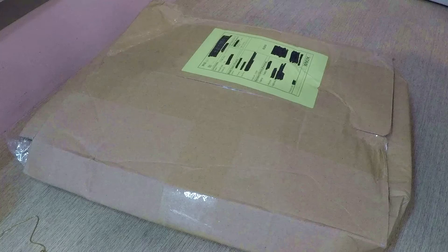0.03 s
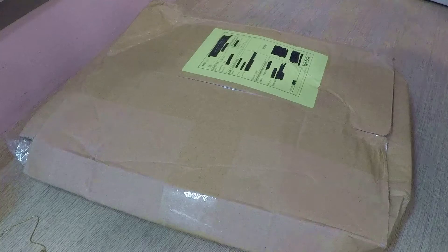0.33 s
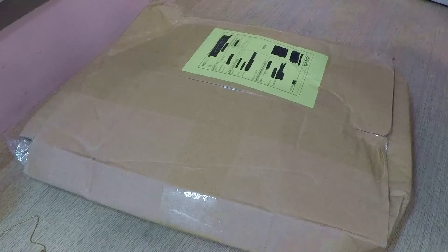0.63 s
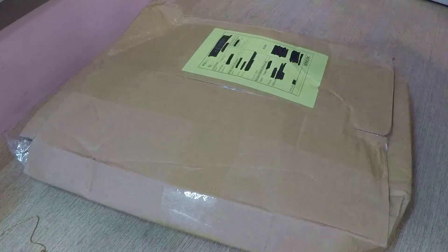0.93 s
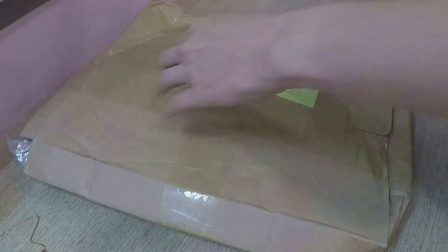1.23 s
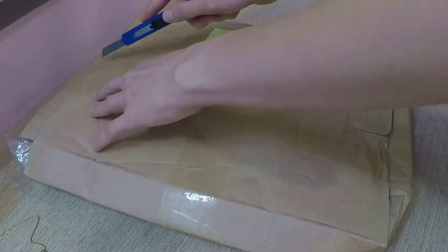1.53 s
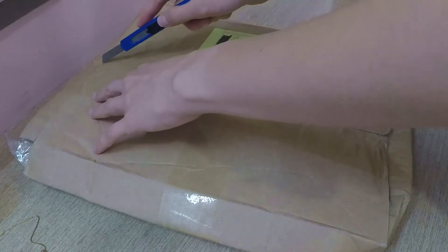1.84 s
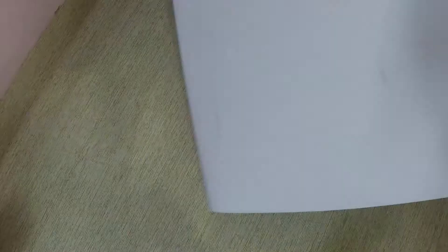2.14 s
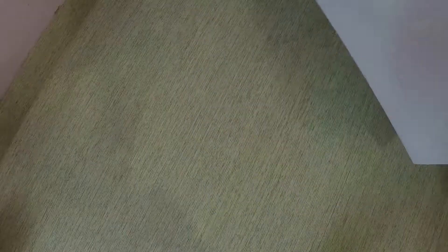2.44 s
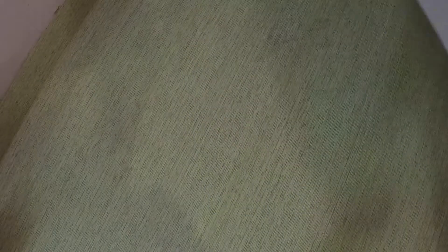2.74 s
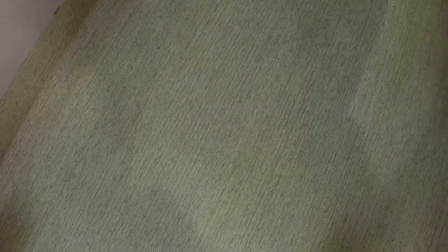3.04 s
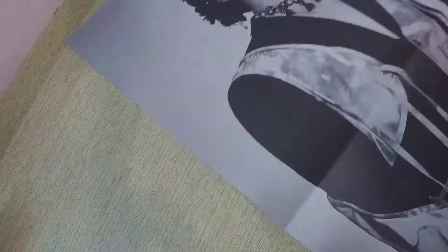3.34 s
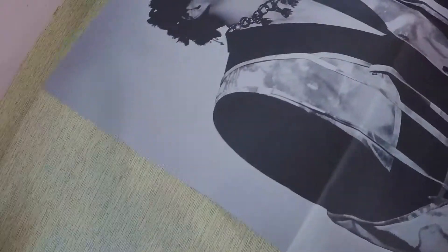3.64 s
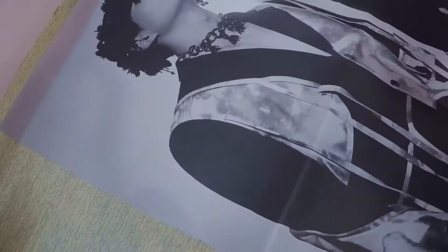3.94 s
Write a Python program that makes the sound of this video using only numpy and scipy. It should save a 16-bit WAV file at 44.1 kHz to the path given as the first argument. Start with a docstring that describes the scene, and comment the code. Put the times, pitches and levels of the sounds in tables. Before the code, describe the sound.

A box cutter clicks out, then a large paper poster is unfolded, rustling and popping.

```python
"""Ten bright clicks sound close by: the sprung slider of a box cutter ratchets out, each impact
setting the blade ringing. Fingers brush a parcel and its packing tape ticks. The scene changes to a
large folded poster opening on a cloth-covered table: friction makes it hiss, bending makes it crackle,
and its panels buckle with hollow pops. A last soft bump leaves one low mode ringing.
A small room reverberates after the clicks, ticks and pops."""
import sys
import numpy as np
from scipy import signal
from scipy.fft import rfft, irfft, next_fast_len
from scipy.io import wavfile
from scipy.ndimage import map_coordinates

SR = 44100
rng = np.random.default_rng(int(sys.argv[2]) if len(sys.argv) > 2 else 0)


def output_pcm(signal):
    """Save a mono or channel-first signal as 16-bit PCM at the path in sys.argv[1].

    Samples are clipped to [-1, 1] before scaling.
    """
    pcm = np.clip(np.atleast_2d(signal).T, -1, 1) * 32767
    wavfile.write(sys.argv[1], SR, np.round(pcm).astype(np.int16))


N = 176400
START_S, SCENE_CHANGE_S = 0.103, 2.2065

# Levels and gains in the tables are relative; T60 is the time taken to decay by 60 dB.
# Reverberation of the room (frequency [Hz], T60 [s])
ROOM_T60 = [(150, .3), (700, 0.35), (2000, 0.32), (5500, 0.28), (7200, .23), (10000, 0.4), (15000, 0.25)]
# Spectrum of the background noise (frequency [Hz], gain [dB])
BACKGROUND_SPECTRUM = [(15, -55), (25, -20), (107, -56), (136, -1.5), (198, 0.5), (240, -3.5), (274, -4.5),
                       (349, -6.5), (848, -17), (1140, -15.5), (4040, -27), (5010, -30), (5880, -25),
                       (10900, -29.5), (15500, -45)]
# Left-right likeness of background, clicks and rustling (frequency [Hz], correlation [-1 to 1])
BACKGROUND_CORRELATION = [(60, 0.23), (180, 0.17), (350, -0.15), (550, -0.72), (850, -0.86), (1400, -0.58),
                          (2200, -0.21), (4000, 0.32), (7000, -0.11), (15000, 0.053)]
CLICK_CORRELATION = [(300, 0.73), (1400, 0.8), (2000, 0.65), (4400, 0.85), (7000, 0.53), (8500, 0.23),
                     (10000, -0.29), (15000, .05)]
RUSTLE_CORRELATION = [(60, -0.03), (200, 0.85), (380, 0.96), (620, -0.23), (1000, -0.12), (2000, 0.097),
                      (3500, .8), (5000, .55), (7500, -0.0089), (10000, -0.12), (15000, 0)]

# Friction of the slider in its track (time [s], level [dB])
SLIDER_LEVELS = [(.102, -75), (.195, -83.5), (.21, -40), (.28, -41.5), (.31, -56), (.42, -49), (.52, -57.5),
                 (.69, -60), (.8, -61), (1, -83)]
# Impacts in the notches (time [s], level [dB], treble lift [dB], rebound [dB], spring resonance [Hz],
# blade ring [dB], decay time [s])
NOTCH_IMPACTS = [(0.207, -9, 18, -15, 5300, -38, 0.00064), (0.2287, -10.5, 16.5, -12, 6500, -23, 0.00093),
                 (0.2561, -16, 9, -0.5, 6640, -33, 0.0013), (0.3139, -9.5, 8.5, -18, 6250, -23, 0.0013),
                 (0.3551, -9.5, 5.5, -11, 5800, -33, .0012), (0.42, -10.5, 4, -5.5, 7300, -37, 0.0012),
                 (0.5425, -7.5, 0, -12, 6240, -30, 0.00088), (0.6252, -10, 1, -5, 6040, -36, 0.0013),
                 (0.6576, -8.5, 3.5, -11.5, 6300, -33, 0.0012), (0.6895, -9, -1, -20, 6650, -37, .0011)]
# Spectra of the slider's friction and of its impacts (frequency [Hz], gain [dB])
SLIDER_SPECTRUM = [(120, -50), (1000, -31), (3000, 2), (6500, 2), (8500, -7), (10000, -3), (15000, -13)]
CLICK_SPECTRUM = [(300, -43), (900, -38), (1400, -24.5), (1800, -16), (2400, -15.5), (3400, -8), (4400, -6),
                  (5100, -3.5), (6200, 0), (7500, -4), (8600, -21), (10000, -21.5), (11500, -28.5),
                  (15000, -31)]
# Normal modes of the blade (frequency [Hz], level [dB], T60 [s])
BLADE_MODES = [(1840, -5.5, 0.046), (3470, -16, .04), (4310, 7.5, 0.059), (5200, -21, .06),
               (6000, -16, .07), (6140, -18, .07), (5900, -22, .07), (7300, -12, .05)]

# Friction of fingers on the parcel (time [s], level [dB])
FINGER_LEVELS = [(0.8, -50), (0.868, -53.5), (1.058, -56.5), (1.276, -50.5), (1.454, -53.5), (1.864, -79),
                 (2.014, -61), (2.19, -75)]
# Light contacts on the tape (time [s], level [dB], ring frequency [Hz], decay time [s])
TAPE_TICKS = [(0.858, -38.5, 6100, 0.0016), (0.891, -38.5, 4060, 0.0011), (1.013, -45, 4300, .0012),
              (1.064, -41, 5930, .0012), (1.159, -40, 3180, 0.0009), (1.194, -36.5, 5940, 0.0015),
              (1.298, -39.5, 4380, .0012), (1.322, -30, 3500, 0.0011), (1.633, -36, 4900, 0.0011),
              (1.696, -38.5, 4830, .0012), (1.724, -31.5, 4870, 0.00093), (1.746, -36, 5170, .0012),
              (1.848, -31, 6300, 0.0018), (1.858, -30.5, 5000, 0.0039), (1.945, -39.5, 4900, .0012)]
# Spectra of rubbed paper and of tapped tape (frequency [Hz], gain [dB])
HISS_SPECTRUM = [(100, -42), (800, -15), (2000, -3), (3200, -3), (4500, -1.5), (6300, 0), (7400, -4.5),
                 (8200, -11), (11000, -26), (15000, -36)]
TAPE_SPECTRUM = [(90, -42), (200, -12), (900, -11), (2200, -18), (3500, -9.5), (4400, -7.5), (5000, -2.5),
                 (5600, -6.5), (6600, -4.5), (8500, -18.5), (15000, -38)]

# Buckling panels (time [s], level [dB], lower edge [Hz], resonance [Hz], upper edge [Hz], decay time [s])
PANEL_POPS = [(2.2085, -18, 200, 630, 3400, 0.0026), (2.302, -23.5, 400, 1600, 2010, 0.011),
              (2.342, -20, 400, 1700, 3150, 0.0053), (2.361, -20.5, 250, 600, 3000, 0.0056),
              (2.3852, -12, 600, 1650, 3880, .0025), (2.4, -27.5, 300, 1200, 3030, 0.007),
              (2.519, -30, 450, 1000, 1800, .0088), (2.733, -12.5, 800, 1400, 2970, 0.0017),
              (2.7354, -4, 720, 1300, 2400, 0.001), (2.7391, -12, 650, 830, 2300, .0018),
              (2.797, -33, 500, 1400, 2000, 0.015), (2.825, -34.5, 400, 1100, 1800, .005),
              (2.926, -34.5, 200, 400, 800, 0.0081), (2.98, -30, 250, 450, 1360, 0.006),
              (3.014, -20.5, 150, 800, 2720, 0.0068), (3.024, -20.5, 150, 1100, 1710, 0.0061),
              (3.106, -27, 200, 650, 2020, 0.0038), (3.122, -32.5, 200, 620, 1200, .006),
              (3.141, -30, 150, 300, 880, .0025), (3.173, -30, 497, 1500, 1870, 0.013),
              (3.222, -35.5, 900, 1700, 1980, .007), (3.249, -32, 900, 1450, 2110, .0045),
              (3.2814, -23, 150, 950, 1300, 0.0049), (3.379, -25, 800, 1400, 2950, 0.0021),
              (3.864, -31, 500, 1500, 5000, 0.0077), (3.882, -22, 400, 1300, 2150, 0.0022),
              (3.93, -30.5, 400, 900, 2100, 0.0055), (3.95, -33.5, 900, 1750, 2000, 0.0028)]
# Dull flaps of the sheet on the table (time [s], level [dB], frequency [Hz])
TABLE_FLAPS = [(2.208, -23, 313), (2.364, -30, 180), (2.381, -36, 150), (2.998, -28.5, 233),
               (3.109, -27, 211), (3.14, -29.5, 235), (3.286, -25.5, 222)]
# Phase difference of the direct pops and flaps (frequency [Hz], lead of left over right [rad])
POP_PHASE_LEAD = [(150, 0), (400, 0.31), (600, 2.1), (1000, 0.85), (1700, 0.8), (2500, 0.63)]
# Faint low pulses (time [s], level [dB])
THUMP_PULSES = [(2.209, -41), (3.305, -46)]
# Envelopes of the sheet sliding, bending and displacing air (time [s], level [dB])
SLIDE_LEVELS = [(2.215, -41), (2.279, -45), (2.387, -37), (2.417, -48), (2.491, -51.5), (2.575, -44.5),
                (2.619, -47.5), (2.703, -43), (2.727, -53.5), (2.737, -48), (2.747, -58), (2.767, -53.5),
                (2.827, -44.5), (2.861, -58), (2.881, -49), (2.905, -44.5), (2.931, -48), (2.961, -45),
                (2.985, -52), (3.207, -49.5), (3.241, -41), (3.271, -46), (3.291, -57.5), (3.355, -44),
                (3.409, -49), (3.583, -53), (3.771, -51.5), (3.805, -56.5), (3.885, -43.5), (3.909, -51.5),
                (3.973, -57.5), (3.99, -48)]
BEND_LEVELS = [(2.21, -30), (2.28, -38.5), (2.33, -39), (2.39, -33), (2.44, -39.5), (2.49, -43.5),
               (2.6, -43), (2.69, -38), (2.82, -41.5), (2.87, -46), (2.97, -42.5), (3.08, -54), (3.16, -50),
               (3.25, -38.5), (3.32, -52), (3.5, -51.5), (3.83, -73), (3.9, -36), (3.99, -44.5)]
AIR_LEVELS = [(2.21, -42.5), (2.38, -35.5), (2.5, -44.5), (2.62, -46.5), (2.78, -38), (2.9, -45),
              (3.15, -41), (3.35, -42.5), (3.6, -55.5), (3.99, -69)]
# Spectra of the sheet's pops, its crackle and the displaced air (frequency [Hz], gain [dB])
POP_SPECTRUM = [(80, -39.5), (200, -2.5), (400, 1), (600, 2), (850, 0), (1050, -1), (1400, -1),
                (1900, -0.5), (2400, -5), (5000, -2.5), (15000, -23)]
CRACKLE_SPECTRUM = [(150, -20), (280, 2.5), (420, 8), (600, 0.5), (1000, 0.5), (1700, 1.5), (2400, -9),
                    (3500, -7.5), (7000, -39), (15000, -65)]
AIR_SPECTRUM = [(30, -44), (95, -43), (125, -12), (160, 8), (220, -7), (330, -12), (600, -22), (2000, -66)]
# Passes of the edge over the cloth (time [s], level [dB], half length [s], centre frequency [Hz])
EDGE_SWISHES = [(2.235, -62, .04, 12000), (2.332, -56, 0.048, 10900), (2.58, -56, 0.021, 11000),
                (2.907, -40, 0.012, 6300), (3.358, -58, 0.043, 11000), (3.45, -52, 0.099, 3970),
                (3.693, -59, .08, 5600)]
# Lowest mode of the hanging sheet (time [s], frequency [Hz], level [dB])
SHEET_MODE = [(2.24, 178, -56), (2.28, 162, -41), (2.335, 152, -47), (2.375, 152, -36), (2.42, 130, -47),
              (2.56, 124, -51), (2.66, 122, -68)]
# Level difference between the channels (frequency [Hz], left over right [dB])
CHANNEL_BALANCE = [(150, -1.3), (600, -0.4), (1300, -0.7), (1850, 2.5), (2900, -2.5), (5000, -1.5),
                   (7000, 0.5), (9000, -2), (15000, 0.5)]

TIME = np.arange(N) / SR
HIT_SAMPLES = 8192
HIT_TIME = (np.arange(HIT_SAMPLES) - HIT_SAMPLES // 16) / SR  # seconds around a contact at zero
HIT_AGE = np.maximum(HIT_TIME, 0)


def amp(db):
    """Amplitude ratio: tenfold for every 20 dB."""
    return 10 ** (np.asarray(db) / 20)


def unit(x):
    """Normalisation to an rms of 1."""
    return x / np.sqrt(np.mean(x ** 2) + 1e-20)


def along(points, hz):
    """Interpolation of (frequency [Hz], value) points on a logarithmic axis."""
    frequencies, values = np.transpose(points)
    return np.interp(np.log(hz + 1), np.log(frequencies + 1), values)


def envelope(rows):
    """Amplitude envelope through (time [s], level [dB]) points."""
    return amp(np.interp(TIME, *np.transpose(rows)))


def fade_in(s):
    """Linear onset of 3 ms, starting at time s."""
    return np.clip((TIME - s) / .003, 0, 1)


def filtered(x, response):
    """Linear filtering: the spectrum is multiplied by a frequency response."""
    size = next_fast_len(N + SR // 4)
    return irfft(rfft(x, size) * response(np.fft.rfftfreq(size, 1 / SR)), size)[..., :N]


def resonance(hz, centre_hz, height_db, width):
    """Lorentzian peak on a flat response; its half width is a fraction of the centre frequency."""
    return 1 + amp(height_db) / (1 + ((hz / centre_hz - 1) / width) ** 2)


def burst(decay_s, lead_db, lead_s=0.00095, evenness=0.26):
    """Transient excitation: two noises grow exponentially to a catch, then decay."""
    rise = amp(lead_db) * np.exp(-abs(HIT_TIME) / lead_s)
    fall = np.exp(-abs(HIT_TIME) / decay_s)
    spectrum = rfft(rng.standard_normal((2, HIT_SAMPLES)) * np.where(HIT_TIME < 0, rise, fall))
    return irfft(spectrum / (abs(spectrum) + 1e-9) ** evenness)  # partly flattens the spectrum


def struck(excitation, gain, decay_s):
    """Source and filter: a minimum-phase body colours a burst, scaled by energy to peak near 1."""
    hz = np.fft.rfftfreq(HIT_SAMPLES, 1 / SR)
    cepstrum = irfft(np.log(np.maximum(gain(hz), 1e-6)))
    cepstrum[1:HIT_SAMPLES // 2] *= 2  # folding the cepstrum makes the filter causal
    cepstrum[HIT_SAMPLES // 2 + 1:] = 0
    sound = irfft(rfft(excitation) * np.exp(rfft(cepstrum)))
    return sound / np.linalg.norm(sound, axis=-1, keepdims=True) * np.sqrt(decay_s * SR) / 2


def mode(hz, db, t60):
    """Free vibration of a damped mode: an exponentially decaying sinusoid."""
    return amp(db - 60 * HIT_AGE / t60) * np.sin(2 * np.pi * hz * HIT_AGE)


def add(track, s, x):
    """Superposition of a contact on the track at time s."""
    start = round((s + HIT_TIME[0]) * SR)
    track[..., start:start + x.shape[-1]] += x[..., :max(N - start, 0)]


def spread(pair, correlation):
    """Sum and difference turn two independent signals into partly correlated left and right."""
    side = filtered(pair[1], lambda hz: np.tan(np.arccos(along(correlation, hz)) / 2))
    return np.array([pair[0] + side, pair[0] - side])


def noise(spectrum, grain, correlation=RUSTLE_CORRELATION, snaps_per_s=1500):
    """Coloured stereo noise of rms 1: grain is the share of power in shot noise, the rest is Gaussian."""
    sizes = amp(1.5 * np.minimum(rng.exponential(size=N), 4))
    snaps = unit((rng.random(N) < snaps_per_s / SR) * sizes * rng.standard_normal((2, N)))
    pair = np.sqrt(grain) * snaps + np.sqrt(1 - grain) * rng.standard_normal((2, N))
    return unit(spread(filtered(pair, lambda hz: amp(along(spectrum, hz))), correlation))


def reverberation(x, early_db=6, early_t60=0.08, build_up_s=0.0023):
    """Convolution with two independent room responses: dense early reflections and a short tail."""
    hz, t, spectra = signal.stft(rng.standard_normal((2, SR // 2)), SR, nperseg=256)
    decay = amp(-60 * t / along(ROOM_T60, hz)[:, None]) + amp(early_db - 60 * t / early_t60)
    tail = signal.istft(spectra * decay, SR, nperseg=256)[1]
    tail *= np.minimum(np.arange(tail.shape[1]) / SR / build_up_s, 1) ** 2
    return signal.fftconvolve(x[None], tail / np.linalg.norm(tail[0]), axes=1)[:, :N]


def room_tone():
    """Stationary noise, strongest in the bass, forms a faint background."""
    return amp(-47.5) * noise(BACKGROUND_SPECTRUM, 0, BACKGROUND_CORRELATION)


def cutter(rebound_s=0.0038, direct_db=-1, reverb_db=-5):
    """Friction and impact: the slider rubs, drops into each notch and rebounds; the blade's modes ring."""
    clicks = np.zeros((2, N))
    treble = lambda hz: along([(7000, 0.053), (9500, 0.95), (11000, 0.72), (14000, 0.45)], hz)
    for s, db, lift_db, rebound_db, spring_hz, blade_db, decay_s in NOTCH_IMPACTS:
        colour = lambda hz: amp(along(CLICK_SPECTRUM, hz) + lift_db * treble(hz))
        body = lambda hz: colour(hz) * resonance(hz, spring_hz, height_db=3, width=.04)
        sideways = lambda hz: colour(hz) * amp(treble(hz))  # more treble radiates into the room
        ring = amp(blade_db) * sum(
            mode(db=mode_db + rng.normal(0, 2.3), hz=hz * rng.normal(1, 0.0075), t60=t60)
            for hz, mode_db, t60 in BLADE_MODES)
        rebound = amp(rebound_db) * struck(burst(decay_s, lead_db=-1.5), body, decay_s)
        rebound = np.roll(rebound, round(rebound_s * SR), axis=1)
        impact = struck(burst(decay_s, lead_db=-1.5), body, decay_s)
        radiated = struck(burst(decay_s, lead_db=-1.5, evenness=0.6), sideways, decay_s)
        add(clicks, s, amp(db + direct_db) * (impact + rebound + ring))
        add(clicks, s, amp(db + reverb_db) * reverberation(radiated[0] + rebound[0] + ring))
    rubbing = envelope(SLIDER_LEVELS) * noise(SLIDER_SPECTRUM, 0.67, CLICK_CORRELATION)
    pan_left = amp([[.7], [-.7]])
    return pan_left * spread(clicks, CLICK_CORRELATION) + rubbing


def parcel():
    """Friction of the fingers makes a hiss; light impacts on the tape each excite one thin ring."""
    ticks = np.zeros((2, N))
    tape = lambda hz: amp(along(TAPE_SPECTRUM, hz))
    for s, db, ring_hz, decay_s in TAPE_TICKS:
        snap = struck(burst(decay_s, lead_db=-1), tape, decay_s)
        add(ticks, s, amp(db) * (snap + mode(ring_hz, db=-7, t60=0.013)))
    ticks += amp(-3.5) * reverberation(ticks[0])
    brushing = amp(-7) * envelope(FINGER_LEVELS) * noise(HISS_SPECTRUM, grain=0.52)
    return spread(ticks, CLICK_CORRELATION) + brushing


def buckling(low_cut_hz=144, leak_db=-46):
    """Snap-through buckling: panels of the sheet pop with a hollow resonance and flap on the table."""
    direct, reverb = np.zeros(N), np.zeros((2, N))
    for s, db, low_hz, panel_hz, high_hz, decay_s in PANEL_POPS:
        band = lambda hz: (1 - 1 / (1 + (hz / low_hz) ** 3)) / (1 + (hz / high_hz) ** 5) + amp(leak_db)
        peak = lambda hz: resonance(hz, panel_hz, height_db=1, width=0.073)
        panel = lambda hz: amp(along(POP_SPECTRUM, hz)) * band(hz) * peak(hz)
        snap = burst(decay_s, lead_db=1, lead_s=0.00057, evenness=0.49)[0]
        pop = amp(db - 0.5) * struck(snap, panel, decay_s)
        add(direct, s, pop)
        add(reverb, s, amp(-5.5) * reverberation(pop))
    for s, db, hz in TABLE_FLAPS:
        add(direct, s, mode(hz, db, t60=0.033))
    phase_shift = lambda hz: np.exp(.5j * np.outer([1, -1], along(POP_PHASE_LEAD, hz)))
    stereo = filtered(direct, phase_shift) + spread(reverb, RUSTLE_CORRELATION)
    return filtered(stereo, lambda hz: 1 - 1 / (1 + (hz / low_cut_hz) ** 8))


def thumps(decay_s=0.0018):
    """Critically damped pulses: two faint low thumps without any ring."""
    out, scaled_age = np.zeros(N), HIT_AGE / decay_s
    for s, db in THUMP_PULSES:
        add(out, s, amp(db) * scaled_age * np.exp(1 - scaled_age))
    return out


def unfolding(bunches_per_s=40, bunch_db=3):
    """The sheet hisses by friction, crackles as creases yield in bunches, and displaces air."""
    hiss = amp(2.5) * envelope(SLIDE_LEVELS) * noise(HISS_SPECTRUM, grain=0.26)
    knots = rng.standard_normal(int(N / SR * bunches_per_s) + 2)
    bunches = unit(amp(bunch_db * map_coordinates(knots, [TIME * bunches_per_s])))
    crackle = amp(-2.5) * envelope(BEND_LEVELS) * bunches * noise(CRACKLE_SPECTRUM, grain=0.43)
    waft = amp(-3.5) * envelope(AIR_LEVELS) * noise(AIR_SPECTRUM, grain=0.28)
    return hiss + crackle + waft


def skimming(relative_width=0.2):
    """Friction of the sheet's edge on the cloth gives airy swells of band-limited noise."""
    out = np.zeros((2, N))
    for s, db, half_s, centre_hz in EDGE_SWISHES:
        band = [(centre_hz * np.exp(k * relative_width), -6 * k * k) for k in range(-4, 5)]
        swell = amp(db) * np.exp(-((TIME - s) / half_s) ** 2)
        out += swell * noise(band, grain=.45)
    return out


def wobbling():
    """The hanging sheet vibrates in its lowest mode, whose frequency falls as it opens out."""
    times, frequencies, levels = np.transpose(SHEET_MODE)
    phase = 2 * np.pi * np.cumsum(np.interp(TIME, times, frequencies)) / SR
    return amp(np.interp(TIME, times, levels)) * np.sin(phase)


def bump(onset_s=3.884, hz=160.8, rise_s=0.026, t60=.65, left_lag_rad=1.13, right_over_left_db=1):
    """A soft bump excites one damped mode; level and phase differences place it a little to the right."""
    age = np.maximum(TIME - onset_s, 0)
    swell = amp(-13 - 60 * age / t60) * (1 - np.exp(-age / rise_s))
    ears = np.array([[.5], [-.5]])
    return amp(-right_over_left_db * ears) * swell * np.sin(2 * np.pi * hz * age - left_lag_rad * ears)


def scene():
    """Superposition over steady room tone: first the cutter and parcel, then the poster."""
    background = room_tone()
    cutter_and_parcel = cutter() + parcel()
    poster = buckling() + thumps() + unfolding() + skimming() + wobbling() + bump()
    change = fade_in(SCENE_CHANGE_S)
    return fade_in(START_S) * (background + (1 - change) * cutter_and_parcel + change * poster)


def record(dry, top_hz=15500):
    """Linear filtering colours left and right differently and limits the bandwidth steeply."""
    balance = lambda hz: amp(np.outer([.5, -.5], along(CHANNEL_BALANCE, hz)))
    return filtered(dry, lambda hz: balance(hz) / (1 + (hz / top_hz) ** 100))


dry = scene()
out = record(dry)
output_pcm(out)
```